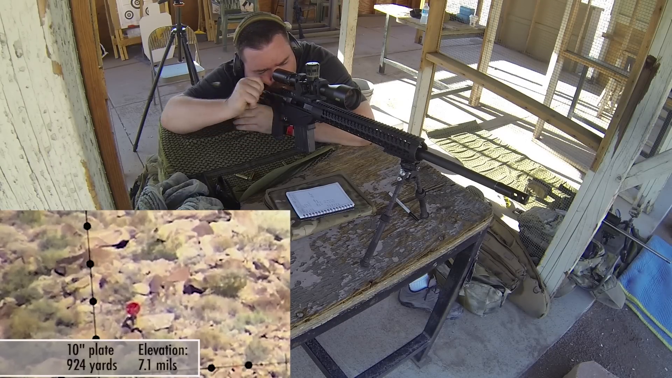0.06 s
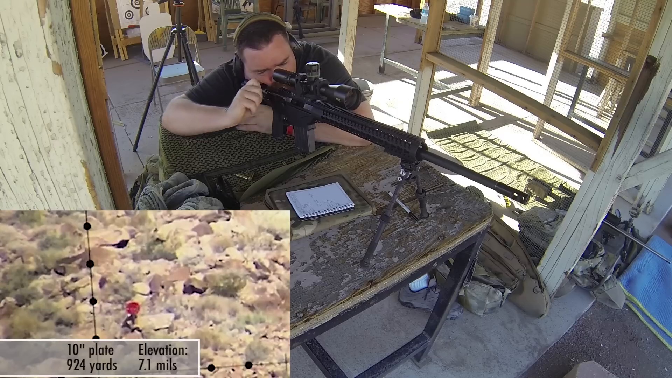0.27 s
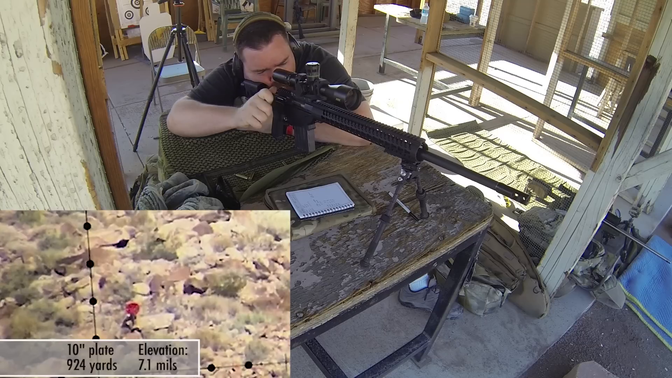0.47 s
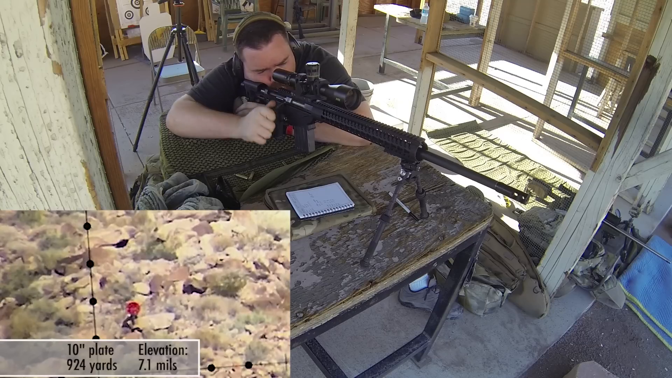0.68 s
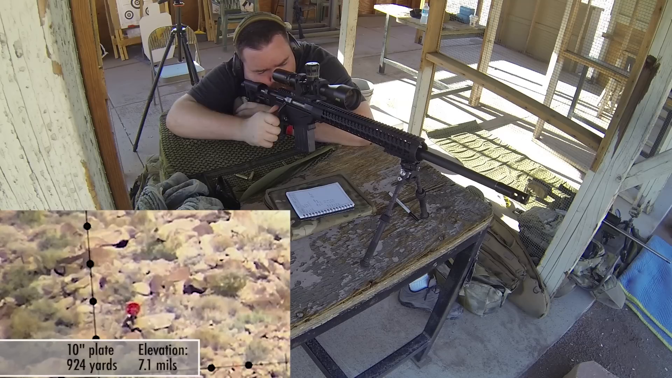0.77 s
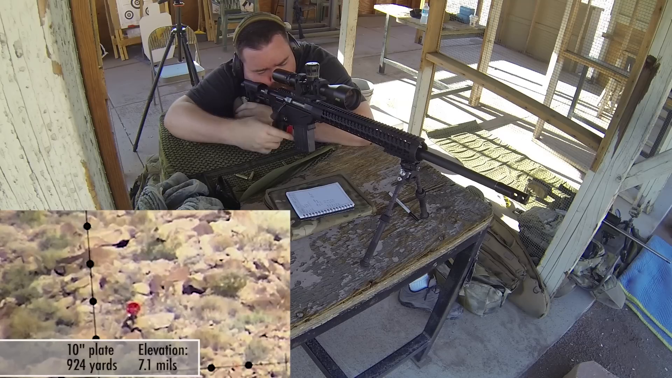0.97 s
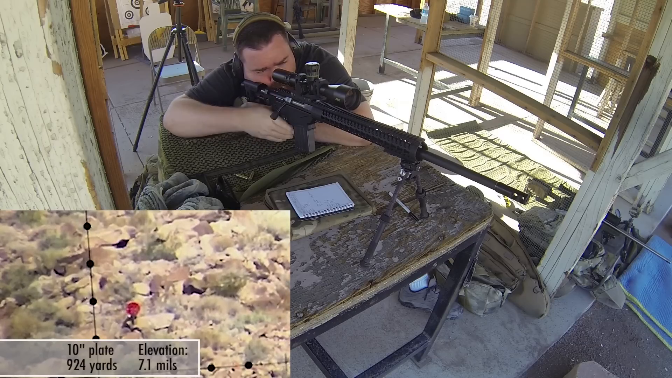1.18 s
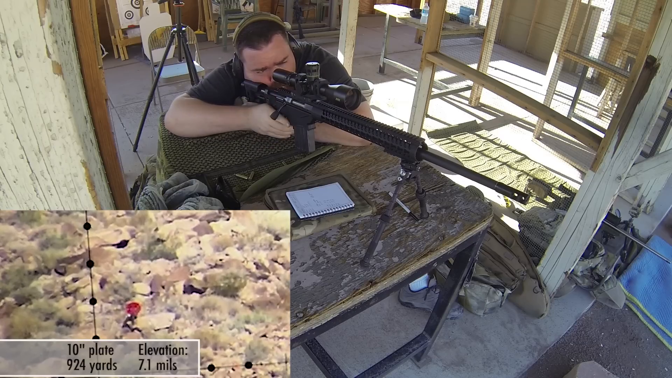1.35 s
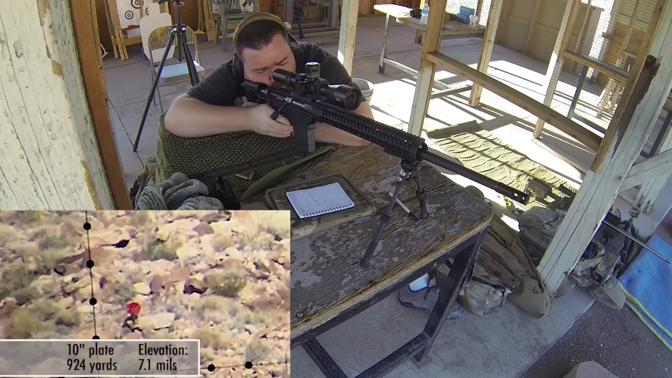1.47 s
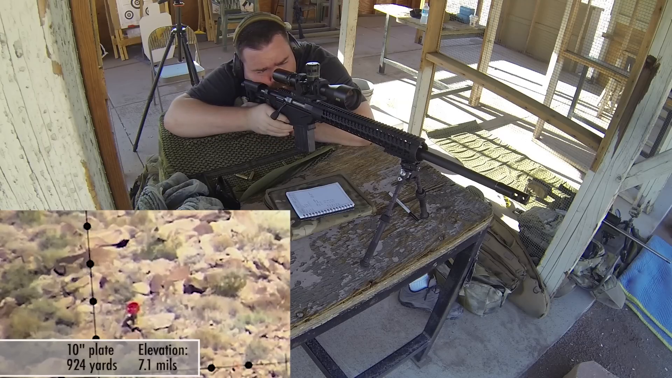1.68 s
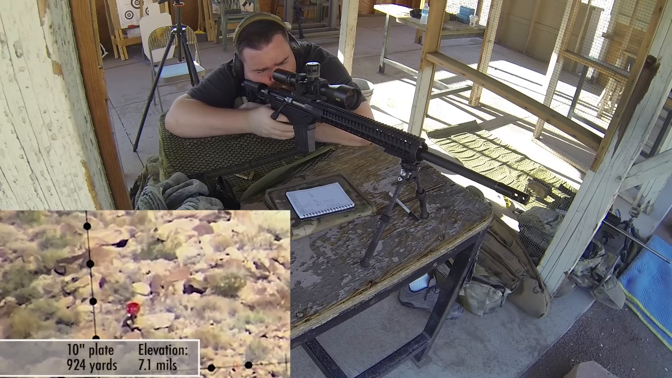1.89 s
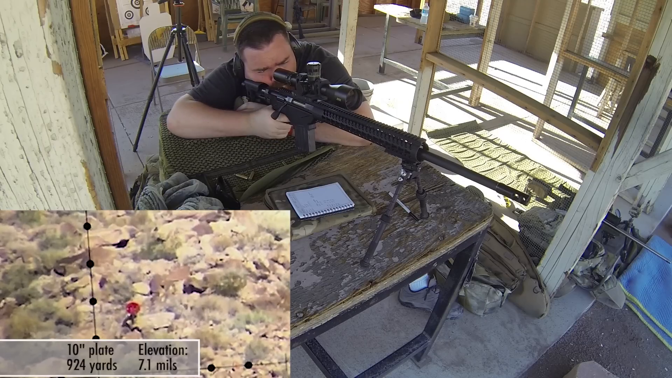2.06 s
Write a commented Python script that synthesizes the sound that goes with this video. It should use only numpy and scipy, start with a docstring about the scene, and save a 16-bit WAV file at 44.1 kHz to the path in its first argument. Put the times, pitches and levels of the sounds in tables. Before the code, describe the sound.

A rifle bolt is racked back and slammed shut, then its ejected brass case bounces on concrete.

```python
"""A bolt-action rifle is cycled on a bench under an open-sided roof, over a low outdoor rumble and a faint whine.
Faint knocks come first, then a hand grips the knob and the bolt rasps back: scrapes are dense random catches.
A brass case pings out as decaying modes. The bolt slides forward, slams home and locks down: each blow is
a burst of coloured noise that rings the steel action and the stock. The handle ticks as it settles, then
the case bounces on the concrete floor, clacking and pinging. Fading noise makes the shelter's reverberation."""
import sys
import numpy as np
from scipy import signal
from scipy.fft import rfft, irfft
from scipy.io import wavfile

SR = 44100
rng = np.random.default_rng(int(sys.argv[2]) if len(sys.argv) > 2 else 0)


def output_pcm(signal):
    """Save a mono or channel-first signal as 16-bit PCM at the path in sys.argv[1].

    Samples are clipped to [-1, 1] before scaling.
    """
    pcm = np.clip(np.atleast_2d(signal).T, -1, 1) * 32767
    wavfile.write(sys.argv[1], SR, np.round(pcm).astype(np.int16))


N = 92610  # 2.1 s


def undb(db):
    """Decibels to gain."""
    return 10 ** (np.asarray(db) / 20)


def unit(x):
    """Scale to an rms of 1."""
    return x / np.sqrt(np.mean(x ** 2))


def through(x, response):
    """Pass a sound through an impulse response."""
    return signal.fftconvolve(x, response)[:N]


def colour(points, size=4096):
    """Causal (minimum-phase) response of unit energy with the given spectrum of (pitch_hz, level_db) points."""
    hz, db = np.array(points, float).T
    f = np.maximum(np.fft.rfftfreq(size, 1 / SR), 1)
    shape_db = np.interp(np.log(f), np.log(hz), db)
    # folding the cepstrum onto positive time makes the response causal
    cepstrum = irfft(np.log(undb(shape_db)))
    cepstrum[1:size // 2] *= 2
    cepstrum[size // 2 + 1:] = 0
    response = irfft(np.exp(rfft(cepstrum)))
    return response / np.linalg.norm(response)


def ring(modes, start=0):
    """Decaying sine modes struck at one moment; nominal rms of 1 at the strike."""
    t = np.maximum(np.arange(N) / SR - start, 0)
    out, power = 0, 0
    for hz, db, t60 in modes:
        decay = np.exp(-np.log(1000) * t / t60)
        out = out + undb(db) * np.sin(2 * np.pi * hz * t) * decay
        power += undb(db) ** 2 / 2
    return out / np.sqrt(power)


def resonate(x, modes):
    """Drive modes with a rough force, through a response of unit energy."""
    response = ring(modes)
    return through(x, response / np.linalg.norm(response))


def envelope(start, rise, hold, decay):
    """Linear rise, hold, exponential release; times in seconds."""
    t = np.arange(N) / SR - start
    return np.clip(t / rise, 0, 1) * np.exp(-np.maximum(t - rise - hold, 0) / decay)


# colour of the outdoor rumble: pitch_hz, level_db
OUTDOOR_TONE = [(15, 4), (28, -1), (55, -3.5), (95, 1.5), (150, -9.5), (240, -14.5), (480, -24),
                (900, -32.5), (2000, -36.5), (5000, -39.5), (9000, -44), (15000, -55)]


def outdoor_rumble():
    """Steady noise, heaviest in the lows."""
    noise = rng.standard_normal(2 * N)
    # the second half is past the filter's build-up
    return undb(-43.5) * unit(signal.fftconvolve(noise, colour(OUTDOOR_TONE))[N:2 * N])


WHINE_HZ, WHINE_SWING_HZ, WHINE_DB = 5150, 450, -63
PULSES_PER_S, PULSE_PEAK_S, WAVER = 24, 1.647, .25


def faint_whine():
    """A very faint high sine that pulses unevenly and rises in pitch between pulse peaks."""
    t = np.arange(N) / SR
    pulse = (1 + np.cos(2 * np.pi * PULSES_PER_S * (t - PULSE_PEAK_S))) / 2
    beats = np.arange(0, N / SR, 1 / PULSES_PER_S)
    # one random drift unsettles both the level and the pitch swing
    waver = 1 + WAVER * np.interp(t, beats, rng.standard_normal(len(beats)))
    pitch_hz = WHINE_HZ + WHINE_SWING_HZ * waver * (1 - pulse)
    sine = np.sin(2 * np.pi * np.cumsum(pitch_hz) / SR)
    return undb(WHINE_DB) * waver * pulse ** 2 * sine


# blows of the bolt on the action: start_s, level_db, contact_decay_ms, treble_corner_hz,
# stock_thump_db (relative to THUMP_DB)
BOLT_BLOWS = [(0.002, -33.5, 24, 6000, -9.5), (0.031, -39, 17, 4530, -17), (0.2128, -13, 3.1, 2220, -8),
              (0.3183, -18, 8.2, 8000, -16.5), (0.3381, -15, 4, 11000, -12.5),
              (0.354, -13, 8.5, 7000, -4.5), (0.3944, -19.5, 6.2, 6000, -8), (0.400, -8, 6.14, 7500, -9.5),
              (0.602, -35.5, 3, 2400, -2), (0.607, -31.5, 5.9, 2000, -1), (0.6186, -11.5, 2.4, 12000, -23),
              (0.6202, -7, 2, 10000, -21.5), (0.6244, -10.5, 2.14, 8000, -18.5),
              (0.678, -22.5, 8.8, 3620, 0.5)]
# colour of a steel contact: pitch_hz, level_db
STEEL_TONE = [(100, -14.5), (400, -5.5), (900, -7), (1250, -3), (1500, 4.5), (1750, 4), (2300, -5.5),
              (4000, -3.5), (6000, 0.5), (8500, -3), (10500, -7.5), (15000, -22)]
# ringing of the steel action: pitch_hz, level_db, t60_s
ACTION_MODES = [(1245, -12, .1), (1500, 4, .09), (1729, 2, .07), (1949, -10, .08), (2222, -11, .07),
                (2915, -8, .07), (3240, -2, .05), (4670, -6, .08), (5361, -1, .1), (5905, -5, .06),
                (6568, -3, .06), (7433, -6, .06), (8728, -5, .04)]
# low ringing of the stock and bench: pitch_hz, level_db, t60_s
STOCK_MODES = [(162, 0, .4), (184, 0, .4), (220, -3, .4), (262, -4, .4)]
ACTION_DB, THUMP_DB = -15.5, -17.5  # relative to the blow


def bolt_blows():
    """Each blow is a short burst of steel chatter that leaves the action and the stock ringing."""
    out, steel = 0, colour(STEEL_TONE)
    for start, level_db, decay_ms, corner_hz, thump_db in BOLT_BLOWS:
        burst = rng.standard_normal(N) * envelope(start, .0004, 0, decay_ms * 1e-3)
        chatter = through(burst, steel)
        action = undb(ACTION_DB) * ring(ACTION_MODES, start)
        thump = undb(THUMP_DB + thump_db) * ring(STOCK_MODES, start)
        b, a = signal.butter(2, corner_hz, fs=SR)
        out = out + undb(level_db) * signal.lfilter(b, a, chatter + action + thump)
    return out


CATCHES_PER_S, CATCH_SPREAD_DB = 6000, 2


def scrape(start, stroke, tone):
    """Dense tiny catches of one surface on another during a stroke."""
    rise, hold, decay, level_db = stroke
    caught = rng.random(N) < CATCHES_PER_S / SR
    signs = rng.choice([-1, 1], N)
    strength_db = CATCH_SPREAD_DB * np.minimum(rng.exponential(size=N), 4)
    catches = unit(caught * signs * undb(strength_db))
    return undb(level_db) * through(catches * envelope(start, rise, hold, decay), colour(tone))


# strokes of the hand and bolt: rise_s, hold_s, decay_s, level_db
GRIP_STROKE = (0, 0.0331, 0.0472, -32.5)
PULL_STROKE = (0.0014, 0.0232, 0.052, -18)
PUSH_STROKE = (0.02, 0.0433, 0.0091, -19.5)
# colour of each stroke: pitch_hz, level_db
GRIP_COLOUR = [(40, -3), (90, 1), (200, 3), (400, -10), (1000, -9.5), (1600, -24.5), (4000, -39.5),
               (12000, -55.5)]
PULL_COLOUR = [(50, -21.5), (110, -15), (180, -3), (380, -8), (520, -6), (800, 0), (1400, -0.5), (2500, -6),
               (4700, -5), (7000, -16.5), (10000, -24), (15000, -42.5)]
PUSH_COLOUR = [(50, -5), (170, 4.5), (360, -2), (1300, -7), (2000, -1.5), (4600, 0), (8400, -9),
               (10500, -12), (15000, -30)]
# resonances of the open action during the pull: pitch_hz, level_db, t60_s
OPEN_ACTION_MODES = [(701, 0, .14), (792, 1, .14), (1008, 0, .14), (1400, -1, .12)]
GRIP_S, PULL_S, PUSH_S = 0.128, 0.2042, 0.3135
PULL_DULL_HZ, PULL_DULL_S = 2470, 0.065
SLIDE_ACTION_DB, SLIDE_OPEN_DB, SLIDE_STOCK_DB = -10, -16.5, -23


def bolt_strokes():
    """The hand grips the knob; the pull rasps through the open action; the push rattles the steel."""
    pull = scrape(PULL_S, PULL_STROKE, PULL_COLOUR)
    push = scrape(PUSH_S, PUSH_STROKE, PUSH_COLOUR)
    grip = scrape(GRIP_S, GRIP_STROKE, GRIP_COLOUR)
    # the rasp loses its treble as the bolt slows
    dull = signal.sosfiltfilt(signal.butter(2, PULL_DULL_HZ, fs=SR, output="sos"), pull)
    treble_fade = np.exp(-np.maximum(np.arange(N) / SR - PULL_S, 0) / PULL_DULL_S)
    pull = dull + (pull - dull) * treble_fade
    open_action = undb(SLIDE_OPEN_DB) * resonate(pull, OPEN_ACTION_MODES)
    stock = undb(SLIDE_STOCK_DB) * resonate(pull + push, STOCK_MODES)
    action = undb(SLIDE_ACTION_DB) * resonate(push, ACTION_MODES)
    return grip + pull + push + open_action + stock + action


# pings of the case wall, on ejection and on the floor: start_s, level_db
CASE_PINGS = [(0.207, -37), (0.826, -45), (0.895, -54), (1.104, -35), (1.243, -39), (1.450, -43)]
# modes of the case wall: pitch_hz, level_db, t60_s
CASE_WALL_MODES = [(9806, 0, .22), (9787, -18, .5), (15270, -27, .2)]
PING_SWELL_S, TUMBLE_PER_S, TUMBLE_DEPTH = .018, 27, .25


def case_pings():
    """The thin brass wall sings when its rim is struck, and flutters as the case tumbles."""
    t = np.arange(N) / SR
    tumble = 1 + TUMBLE_DEPTH * np.sin(2 * np.pi * (TUMBLE_PER_S * t + rng.random()))
    pings = 0
    for start, level_db in CASE_PINGS:
        swell = np.clip((t - start) / PING_SWELL_S, 0, 1)
        pings = pings + undb(level_db) * ring(CASE_WALL_MODES, start) * swell
    return tumble * pings


# small tick of the handle: pitch_hz, level_db, t60_s
HANDLE_MODES = [(4420, 4, 0.029), (4660, -1, 0.025)]


def handle_tick():
    """Two short modes ring as the handle settles."""
    return undb(-26) * ring(HANDLE_MODES, 0.678)


# bounces of the case: start_s, clack_db, hollow_note_db
CASE_BOUNCES = [(0.825, -26.5, -31.5), (1.095, -37, -34.5), (1.243, -44, -43), (1.320, -47.5, -45),
                (1.373, -66, -47.5), (1.400, -69.5, -53), (1.453, -56, -70)]
# colour of the case hitting the floor: pitch_hz, level_db
CLACK_TONE = [(200, -17), (600, -9), (1000, -4), (1450, 3), (2200, -1.5), (4800, -1), (5550, 5),
              (7000, -6.5), (9300, -3), (10800, -20.5), (15000, -27)]
# hollow note of the case mouth: pitch_hz, level_db, t60_s
CASE_AIR_MODES = [(1473, -2, 0.054), (1400, -3, 0.047)]
CLACK_RISE_S, CLACK_HOLD_S, CLACK_DECAY_S = .005, 0.0072, 0.0066


def case_bounces():
    """Each bounce is a noisy clack on the floor and a hollow note from the case mouth."""
    out, floor = 0, colour(CLACK_TONE)
    for start, clack_db, note_db in CASE_BOUNCES:
        contact = rng.standard_normal(N) * envelope(start, CLACK_RISE_S, CLACK_HOLD_S, CLACK_DECAY_S)
        clack = undb(clack_db) * through(contact, floor)
        note = undb(note_db) * ring(CASE_AIR_MODES, start + CLACK_RISE_S)
        out = out + clack + note
    return out


# reverberation of the shelter by band: pitch_hz, t60_s, level_db
SHELTER_BANDS = [(99, 1.7, -0.5), (231, 1.71, 7), (400, 0.93, 3.5), (800, 0.63, 2.5), (1500, 0.37, -1),
                 (2990, 0.33, 0), (6000, 0.33, -2.5), (9000, .31, -1.5), (15000, 0.3, -2.5)]
SHELTER_SWELL_S = 0.0058


def shelter(x):
    """Diffuse reflections from roof, floor and walls, as fading bands of noise; the lows stay longest."""
    hz, t60, db = np.array(SHELTER_BANDS, float).T
    t = np.arange(N) / SR
    log_f = np.log(np.maximum(np.fft.rfftfreq(N, 1 / SR), 1))
    noise, tail = rfft(rng.standard_normal(N)), 0
    # each row of the identity selects one band, crossfading into its neighbours
    for share, seconds, band_db in zip(np.eye(len(hz)), t60, db):
        band = irfft(noise * np.interp(log_f, np.log(hz), share), N)
        swell = np.minimum(t / SHELTER_SWELL_S, 1) ** 2
        fade = swell * np.exp(-np.log(1000) * t / seconds)
        tail = tail + undb(band_db) * band * fade / np.linalg.norm(fade)
    return through(x, tail)


BOLT_WET_DB, CASE_WET_DB, PING_WET_DB = -8, -3.5, -10  # sends into the shelter


def scene():
    """The rifle is close; the case's bounces land farther off, with more of the shelter in them."""
    bolt = bolt_blows() + bolt_strokes() + handle_tick()
    pings, bounces = case_pings(), case_bounces()
    send = undb(BOLT_WET_DB) * bolt + undb(CASE_WET_DB) * bounces + undb(PING_WET_DB) * pings
    background = outdoor_rumble() + faint_whine()
    return (bolt + bounces + pings + shelter(send) + background)[None]


def record(dry):
    """A steep elliptic low-pass cuts the top above 15350 Hz."""
    return signal.sosfilt(signal.ellip(8, .2, 80, 15350, fs=SR, output="sos"), dry)


dry = scene()
out = record(dry)
output_pcm(out)
```